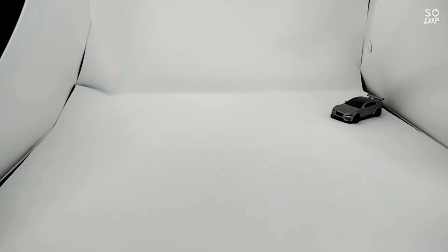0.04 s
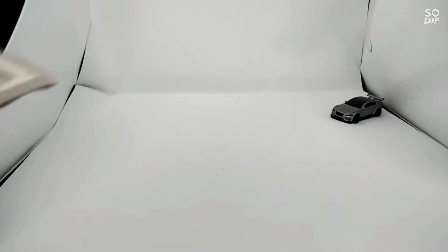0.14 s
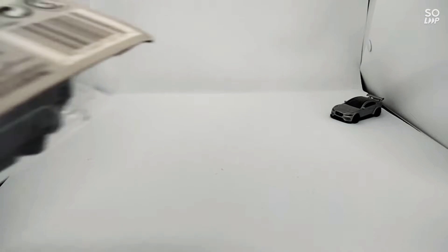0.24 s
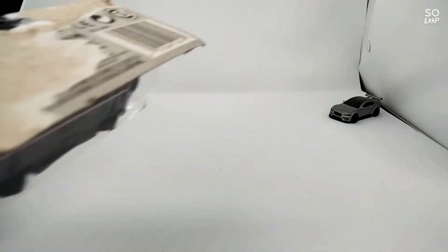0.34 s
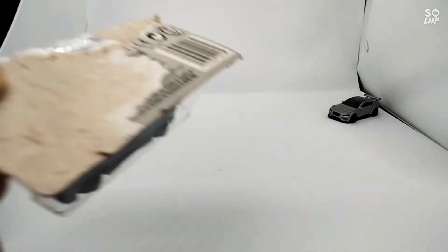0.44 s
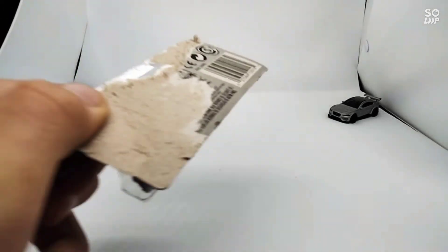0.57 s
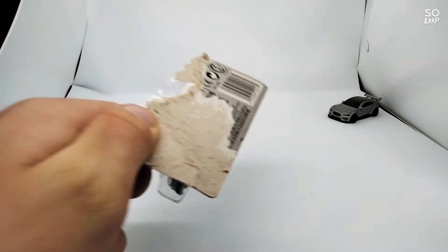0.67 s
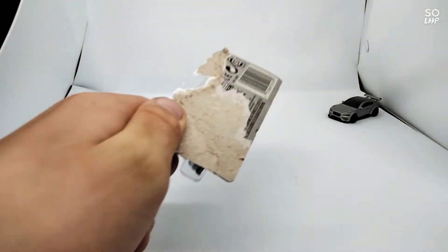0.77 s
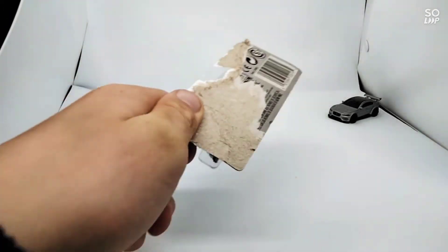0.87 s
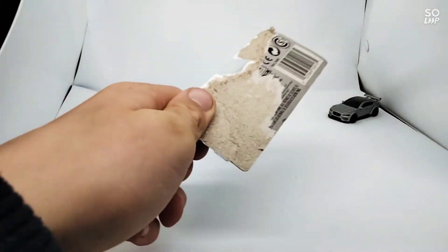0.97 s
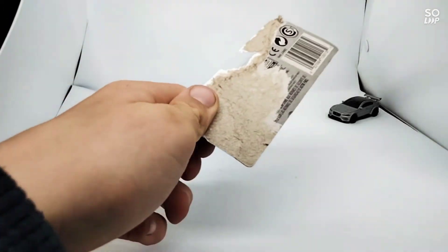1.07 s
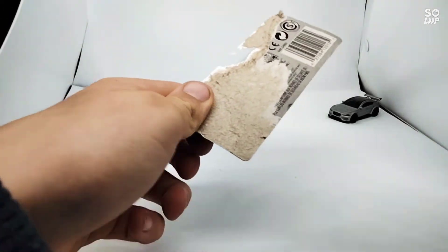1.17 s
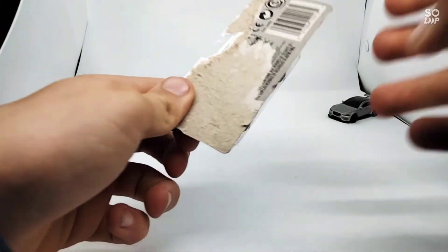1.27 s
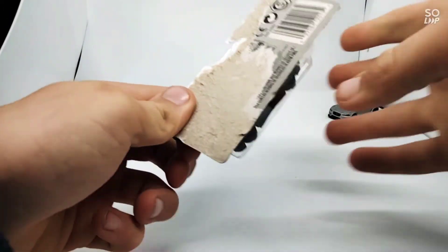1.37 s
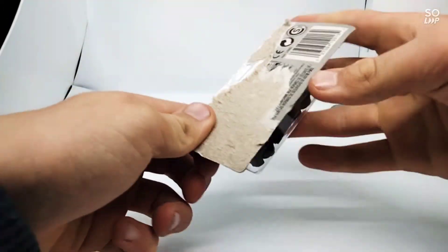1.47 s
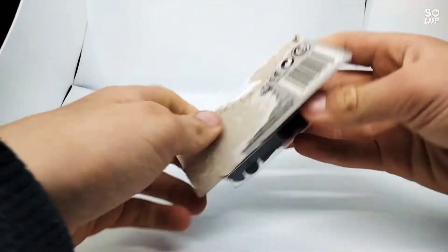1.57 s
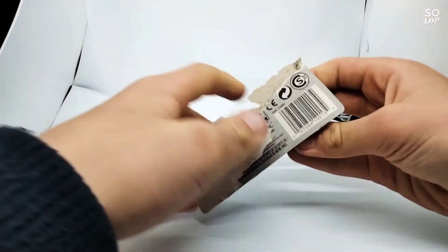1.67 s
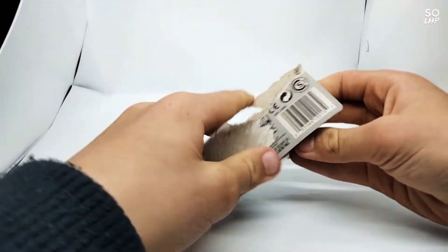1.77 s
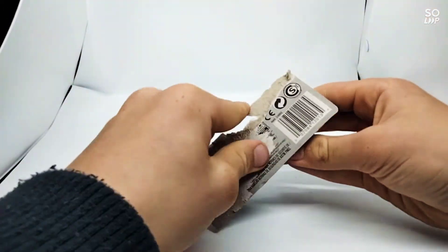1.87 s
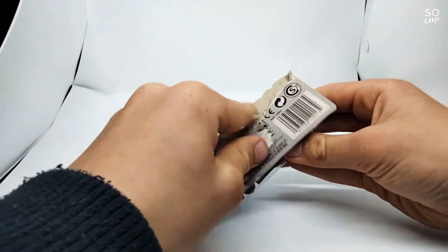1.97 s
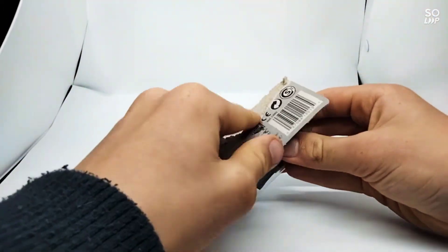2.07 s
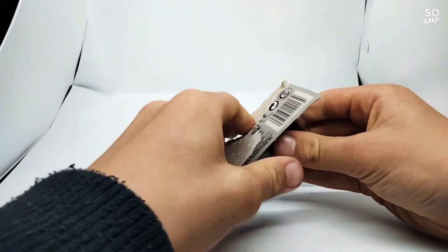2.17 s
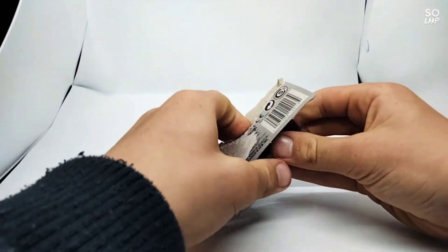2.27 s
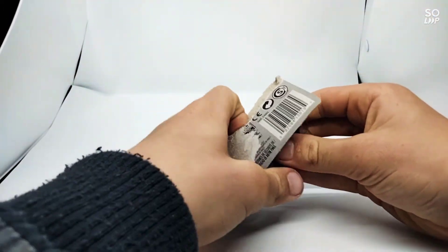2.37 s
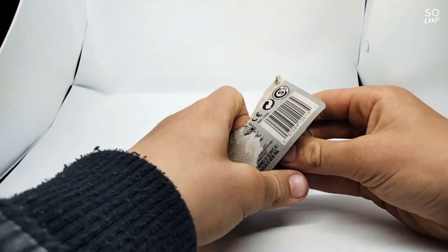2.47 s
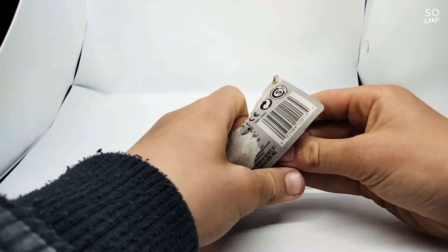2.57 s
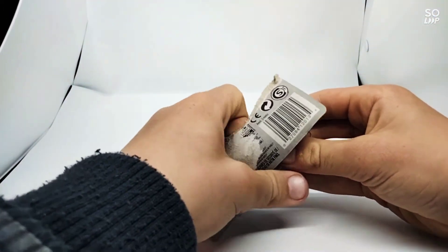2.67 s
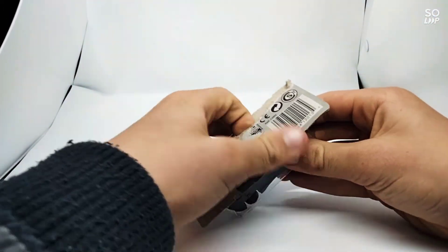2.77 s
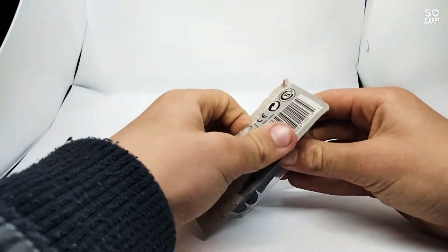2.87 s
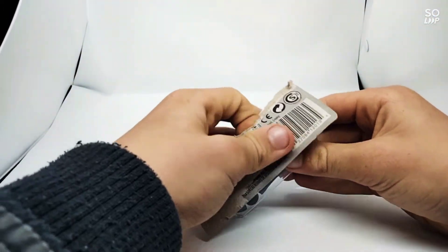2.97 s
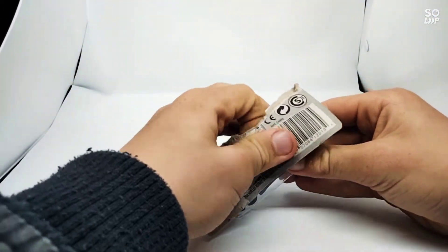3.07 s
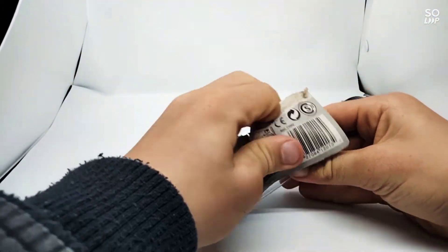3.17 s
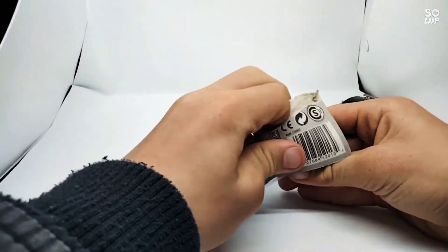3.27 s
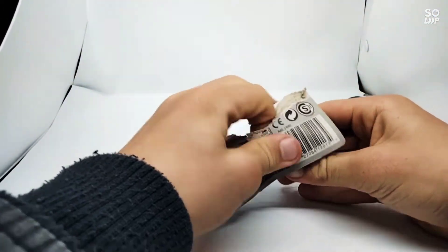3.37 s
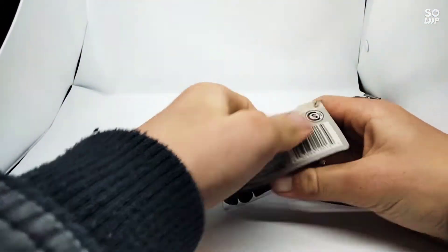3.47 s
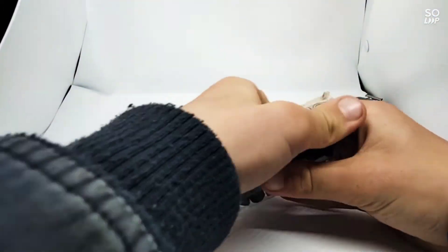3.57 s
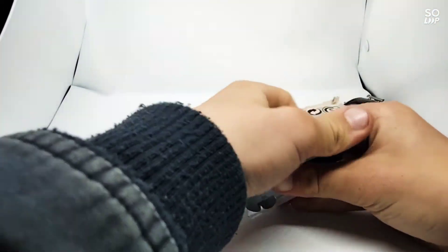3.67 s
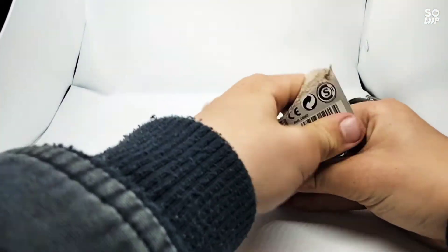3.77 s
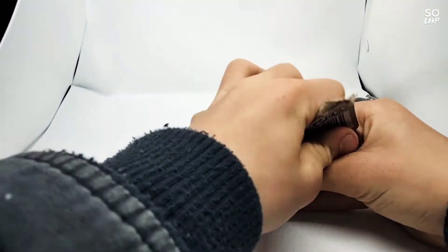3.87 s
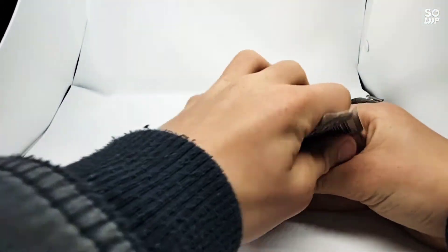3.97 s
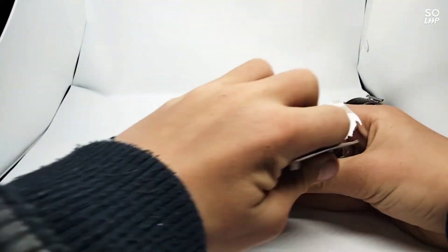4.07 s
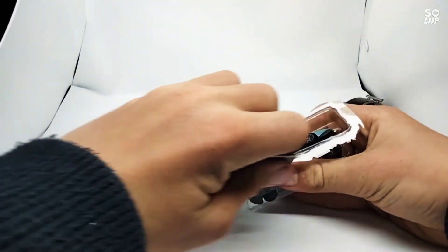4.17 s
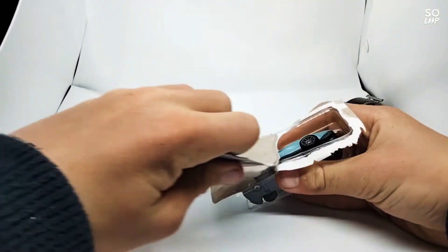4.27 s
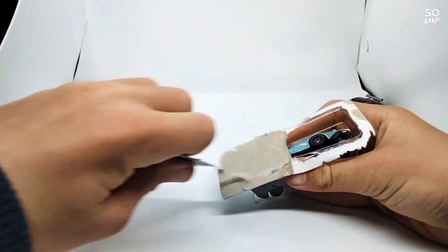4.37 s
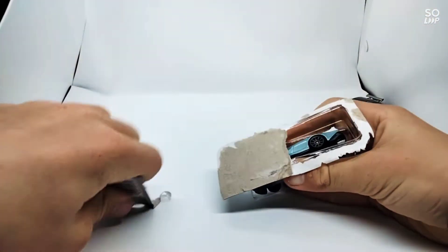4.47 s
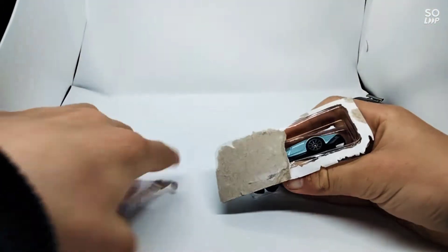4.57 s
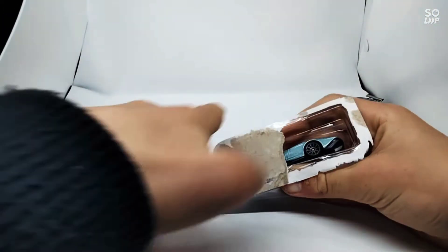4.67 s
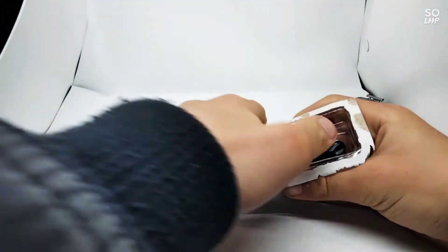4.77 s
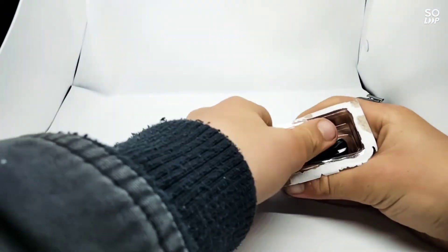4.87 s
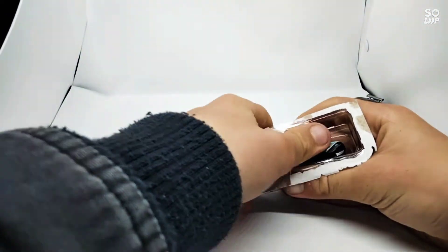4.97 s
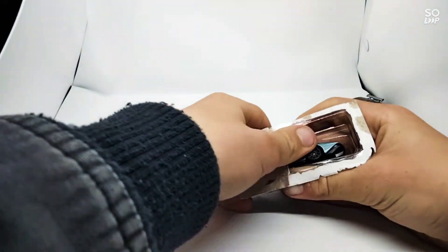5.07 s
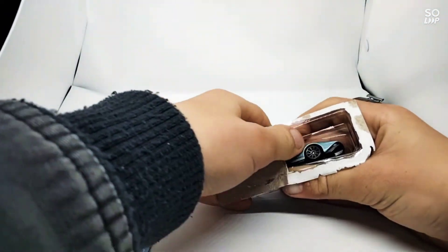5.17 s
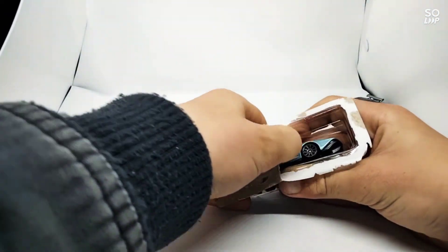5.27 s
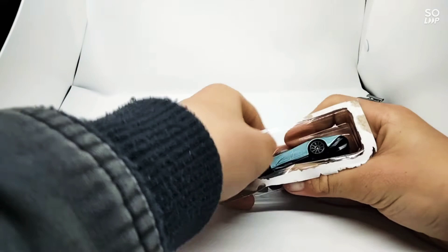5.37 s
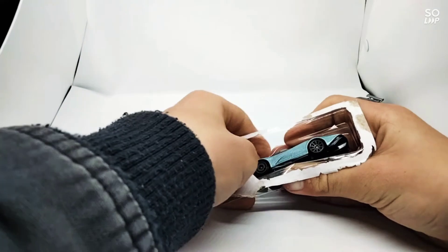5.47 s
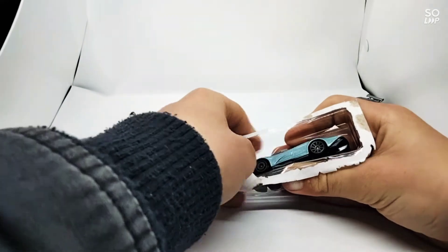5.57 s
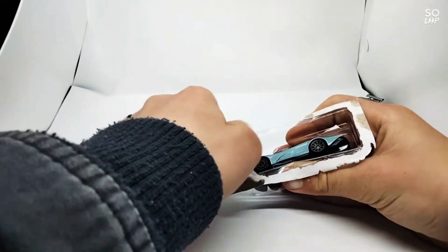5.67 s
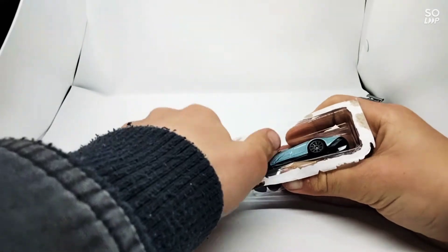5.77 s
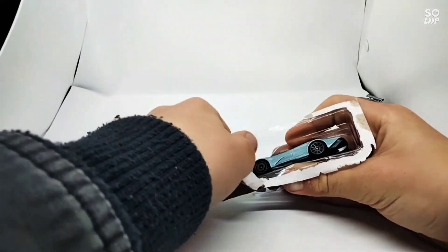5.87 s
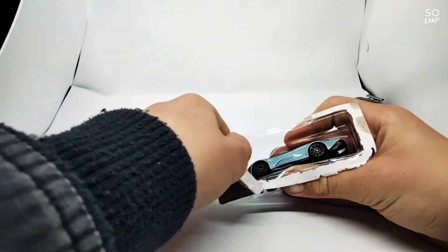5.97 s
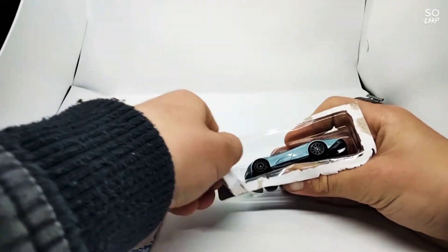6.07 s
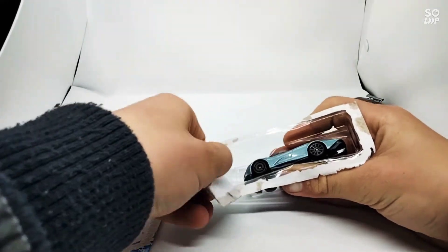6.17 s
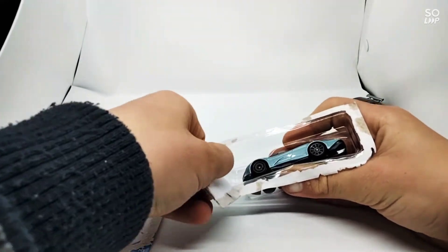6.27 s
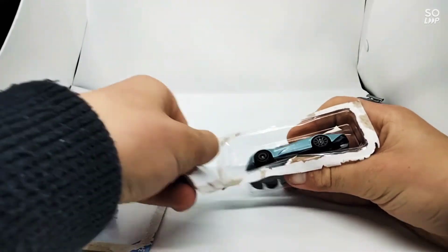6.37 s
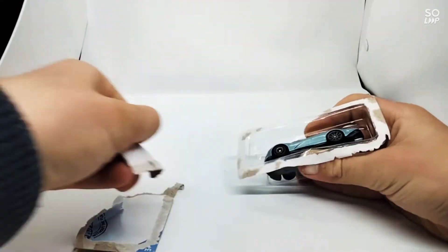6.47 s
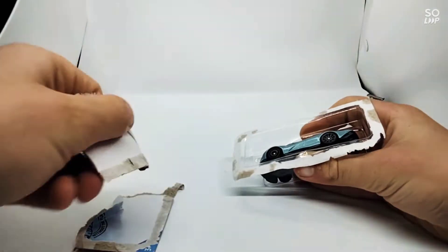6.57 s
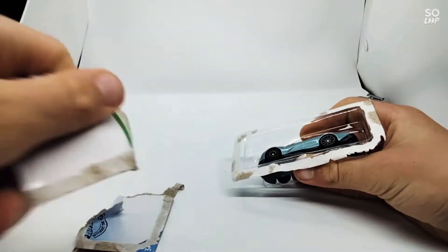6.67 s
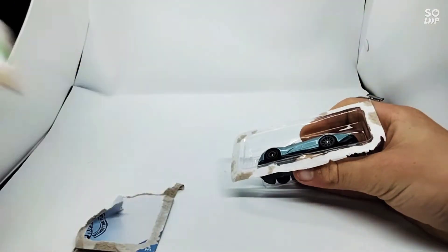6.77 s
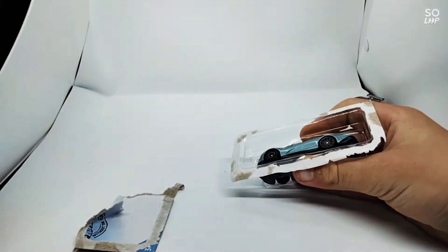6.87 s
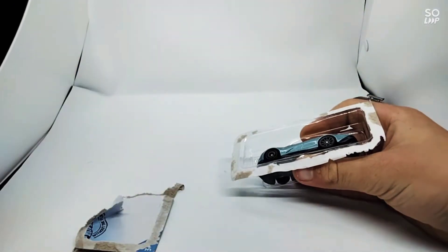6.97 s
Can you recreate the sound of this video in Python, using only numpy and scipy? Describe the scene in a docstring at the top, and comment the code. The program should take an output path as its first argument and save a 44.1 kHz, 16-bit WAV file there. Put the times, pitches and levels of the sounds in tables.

```python
"""A small paper tent on a table: hands work a card-backed blister pack open, close to the microphone.
The plastic shell buckles in sharp snaps, each a flurry of clicks through its resonances; card fibres
tear and rub as dense grains. Decaying low tones give bumps on the table and the low body of some snaps.
Arms lean on the table, two knocks further off ring round the room, and faint noise fills it.
The microphone port lifts the treble near 9 kHz; the top is cut."""
import sys
import numpy as np
from scipy import signal
from scipy.fft import rfft, irfft
from scipy.io import wavfile
from scipy.ndimage import uniform_filter1d

SR = 44100
rng = np.random.default_rng(int(sys.argv[2]) if len(sys.argv) > 2 else 0)


def dump_mix(stems):
    """Bounce the given channels to the path in sys.argv[1] as a 16-bit WAV at rate SR."""
    frames = np.atleast_2d(stems).T  # one column per channel
    limited = np.clip(frames, -1, 1)  # hard clip at full scale
    pcm = np.round(limited * 32767).astype(np.int16)
    wavfile.write(sys.argv[1], SR, pcm)


N = 310023
T = np.arange(N) / SR  # seconds

# All levels are ahead of the microphone.
# spectrum of the room air: pitch_hz, density_db (per Hz, relative)
AIR_SPECTRUM = [(20, 1), (40, -0.5), (64, -12), (110, -12), (190, -22.5), (343, -18.5), (600, -23),
                (910, -25.5), (6100, -38), (8700, -40), (15500, -37.5)]
# arms leaning on the table: time_s, rumble_db, table_top_db (both relative)
LEANING = [(0.0, -87, -82), (0.7, -89, -83), (0.98, -70, -73), (1.15, -74, -94), (1.55, -85, -74.5),
           (2.45, -77, -88.5), (2.96, -76, -79.5), (3.52, -70, -64.5), (3.8, -67, -70),
           (4.17, -66.5, -70.5), (4.38, -66, -66), (5.01, -80, -88.5), (5.58, -92, -87.5),
           (5.851, -85, -73.5), (6.07, -86, -84.5), (6.36, -56, -83), (6.54, -69, -61.5),
           (6.68, -76.5, -79.5), (7.03, -76, -85)]
# knocks across the room: start_s, level_db (relative), brightness_db, boom_db
FAR_KNOCKS = [(0.487, -33.5, -3, -3.5), (0.783, -40, -4.5, -10.5)]
# how the room dies away after a knock: band_hz, decay_t60_s
ROOM_DECAY = [(110, 0.54), (250, 0.13), (600, 0.33), (1000, 0.5), (1900, 0.39), (4000, 0.37), (9000, 0.31),
              (14000, 0.26)]
# colour of the knocks between boom and top treble: pitch_hz, colour_db
KNOCK_TINT = [(600, -11), (1000, 0.5), (1900, 0), (4000, -8)]
# modes of the struck thing: pitch_hz, level_db (relative), decay_t60_s
STRUCK_MODES = [(69, -7, 0.78), (154, -5, 0.37), (209.7, -2, 0.43), (576, -5.5, 0.47), (960, 4.5, 0.16),
                (1720, -3.5, 0.42)]
# low thuds, bumps on the table and the low body of some snaps: start_s, peak_db, pitch_hz, decay_t60_s
LOW_THUDS = [(0.107, -63, 218, 0.094), (0.2, -60.5, 145.5, 0.16), (1.079, -48.5, 57.7, 0.069),
             (1.374, -53.5, 370, 0.032), (1.52, -37, 439, 0.036), (1.737, -50.5, 42.7, 0.13),
             (1.862, -48.5, 253, 0.035), (3.618, -33, 311, 0.027), (3.7, -39.5, 58.6, 0.072),
             (3.738, -46, 43.1, 0.046), (4.347, -45.5, 216, 0.075), (4.362, -49, 62, 0.089),
             (4.681, -58.5, 126, 0.21), (5.3, -53, 67, 0.061), (5.84, -52, 500, 0.026),
             (6.324, -46, 212, 0.13), (6.416, -46.5, 64.3, 0.11), (6.531, -41.5, 46.6, 0.23),
             (6.606, -46, 60, 0.1)]
# the card never rests quite still: time_s, rustle_db (relative), tautness_db (upper over lower modes)
CARD_GRIP = [(0.0, -75, 0), (0.4, -102, -1), (0.75, -76, -10), (1.3, -95, 2), (1.5, -87, -9),
             (2.0, -84, -12), (2.28, -78.5, -0.5), (2.6, -77, -7), (3.05, -81, -19.5), (3.35, -73, -7.5),
             (3.6, -79, -3), (3.76, -72, 6), (4.1, -83, 6), (4.27, -80, -7.5), (4.4, -83, -5.5),
             (5.0, -88.5, -8), (5.3, -83.5, 14.5), (5.619, -90, -4.5), (6.2, -84, 18), (6.45, -66, 2.5),
             (7.03, -79.5, -3.5)]
# strokes that rub or rip the card: full_strength_s, fibres_db (relative), body_minus_fibres_db,
# swell_s (time constant), hold_s, decay_t60_s
CARD_RIPS = [(0.0, -63, -14.5, .01, 0.022, 0.87), (0.155, -55.5, -12.5, 0.011, 0.011, .13),
             (0.188, -56.5, -17, 0.015, 0.017, 0.21), (1.395, -62, 2, 0.0084, 0.12, 0.4),
             (1.514, -41.5, -6, 0.015, 0.00042, 0.044), (1.616, -63.5, 3, 0.0037, 0, 0.097),
             (1.749, -66.5, 0, 0.075, 0.056, 0.25), (1.876, -49, -10.5, 0.0043, 0.01, 0.2),
             (2.041, -59, 1.5, 0.008, 0.0061, 0.033), (2.168, -58, -5, 0.047, 0.124, 0.057),
             (2.268, -51, -2, 0.0096, .0, 0.13), (2.423, -50.5, -18, 0.016, 0.012, 0.13),
             (2.52, -50, -11, 0.0045, 0.0014, 0.18), (2.683, -55.5, -4, 0.028, 0.0055, 0.084),
             (2.853, -57.5, -18, 0.036, 0.12, 0.082), (3.063, -47.5, -6.5, 0.012, 0.036, 0.31),
             (3.31, -56, -2, 0.029, 0.3, 0.33), (3.476, -51, 0.5, 0.0091, .0, 0.1),
             (3.595, -56, -4, 0.015, 0.0048, .2), (3.625, -42, 4, 0.0082, .0, .033),
             (3.734, -38, -5.5, 0.052, 0.022, 0.087), (3.764, -55.5, 4, 0.027, 0.091, 0.28),
             (3.936, -39, -11, 0.027, 0, 1.5), (4.197, -39, -14, 0.012, 0.0093, 0.056),
             (4.208, -56, 2, 0.022, 0.1, 0.17), (4.246, -33, -9.5, 0.0077, .0, 0.073),
             (4.3006, -39, -18, 0.013, .0, .063), (4.471, -53.5, -7.5, 0.088, 0.0069, 0.074),
             (4.666, -59, -7, 0.0088, 0, 2.1), (4.809, -51.5, -12, 0.055, 0.0034, .053),
             (5.193, -57.5, -9.5, 0.0073, 0.065, .1), (5.241, -37, -14, 0.0058, 0.0034, 0.05),
             (5.293, -35.5, -11.5, 0.0042, 0.0075, 0.16), (5.306, -36, -11, .03, 0.0017, 0.09),
             (5.495, -63, -5, 0.012, 0.082, .15), (5.589, -50.5, -8.5, 0.036, 0.0039, 0.081),
             (5.723, -58, -7, 0.0055, 0.1, 0.18), (5.8, -59.5, 6, 0.03, .0, 0.055),
             (5.986, -43.5, -7.5, 0.0082, 0.011, 0.083), (5.999, -35, -13.5, 0.011, 0.0054, 0.11),
             (6.0, -44.5, -12.5, 0.11, 0.0027, 0.45), (6.311, -38, -28, 0.048, 0, 0.072),
             (6.33, -37.5, -5.5, 0.032, 0.0069, 0.1), (6.526, -59.5, -1, 0.044, 0.0096, 0.44),
             (6.5894, -51.5, -32, 0.0095, .0, 0.066)]
# modes of the card: pitch_hz, width_hz, level_db (relative, before tautness)
CARD_MODES = [(528, 79, -8.5), (938, 230, 3.5), (1348, 79, -1), (1590, 120, -3.5), (1950, 330, 1.5),
              (2386, 220, -4.5), (2760, 390, -4), (3790, 1200, -11.5)]
# buckles of the shell: start_s, level_db (relative), ring_hz, ring_minus_level_db,
# sheet_minus_level_db, decay_t60_s
SHELL_SNAPS = [(0.04, -49, 1770, -3, -3, 0.035), (0.0576, -57.5, 876, 0, -6, 0.059),
               (0.079, -57.5, 1860, 5, -5, 0.032), (0.0958, -58, 1870, 11, -5, 0.024),
               (0.1588, -39.5, 1260, -18, -16, 0.092), (0.197, -49, 1370, -2.5, -1, 0.042),
               (0.265, -67, 1270, 2, -6, 0.04), (0.228, -48.5, 2700, -12.5, -22, 0.046),
               (0.313, -67, 1685, 2, -3, 0.04), (0.383, -70.5, 996, 8.5, -10, 0.048),
               (1.1817, -64.5, 504, 6.5, 2.5, 0.059), (1.367, -54, 1790, 3, -17, 0.055),
               (1.3779, -41, 1166, 2.5, -14, 0.1), (1.411, -51, 960, 4, -12, 0.054),
               (1.432, -45.5, 2100, 5.5, -13, 0.017), (1.4885, -44, 1000, 1, -13, 0.039),
               (1.494, -37, 1510, 4, -2, 0.046), (1.5104, -32.5, 1270, 4, 2.5, 0.089),
               (1.523, -34.5, 1530, 7.5, -10, 0.036), (1.5631, -51.5, 1820, 13, 2, 0.033),
               (1.6174, -44, 1310, -2.5, -4, 0.072), (1.636, -49, 1500, 1, 1, 0.044),
               (1.669, -53, 1090, 3, -10, 0.046), (1.701, -50.5, 1032, -3, -6, 0.028),
               (1.73, -44, 1480, -4, -4, 0.066), (1.7395, -40, 1330, -5.5, -15, 0.039),
               (1.8616, -31.5, 1430, -0.5, -1.5, 0.046), (2.1494, -47, 940, -6.5, -20, 0.14),
               (2.4803, -58, 1430, 15.5, 10, 0.024), (2.5067, -20, 1330, -21, -16, 0.036),
               (2.592, -61.5, 970, 5.5, -8, 0.03), (2.6625, -51, 935, -28, -16, 0.16),
               (2.694, -49.5, 960, 6, -3, 0.063), (2.828, -59, 890, 5.5, -8, 0.054),
               (2.85, -55, 900, 3.5, -2, 0.32), (2.891, -45, 860, 2, -12, 0.037),
               (2.9284, -42.5, 961, -34, -34, 0.071), (2.956, -35.5, 525, -39, -37, 0.045),
               (2.9897, -26, 910, -10.5, -5, 0.045), (3.0132, -37, 886, 13, -19, 0.045),
               (3.0517, -20.5, 1140, 1.5, 3, 0.017), (3.054, -15.5, 584, -8, -8, 0.054),
               (3.0686, -23.5, 1050, -10, -21, 0.055), (3.106, -22, 1040, 5.5, -52, 0.023),
               (3.137, -45, 970, 6, -4, 0.048), (3.273, -59, 1360, 9, -16, 0.25),
               (3.2955, -37.5, 1074, 4, 0, 0.057), (3.3245, -42.5, 1310, -25, 9, 0.045),
               (3.336, -31, 906, -10, -5.5, 0.044), (3.3738, -41, 920, 0.5, -16, 0.057),
               (3.4003, -43, 1000, 9, -23, 0.042), (3.479, -41.5, 2090, 8.5, -10, 0.05),
               (3.5623, -29.5, 1270, -4.5, -7, 0.038), (3.5668, -23.5, 1230, 4, -8, 0.034),
               (3.582, -30, 1630, -3, -10, 0.046), (3.6161, -26.5, 1010, 6, -23, 0.047),
               (3.6628, -34.5, 670, -5.5, -9, 0.32), (3.6906, -12, 1410, -9.5, -27, 0.068),
               (3.6958, -18, 1070, -0.5, -5.5, 0.055), (3.7138, -35.5, 1870, 17.5, -3, 0.027),
               (3.7142, -9.5, 2200, -7.5, -3, 0.014), (3.7374, -3.5, 1230, -8.5, -4, 0.027),
               (3.826, -30.5, 2410, -19, -13, 0.054), (3.912, -11, 1320, -15.5, -12.5, 0.05),
               (3.9155, -11.5, 1330, -12, -7.5, 0.032), (3.9348, -30, 1040, -13, -6, 0.19),
               (3.9565, -28.5, 1320, -9, -8, 0.17), (4.0235, -40, 825, -10.5, -3.5, 0.37),
               (4.161, -41, 1830, -8, -4, 0.066), (4.198, -29, 1570, -3.5, -8, 0.34),
               (4.247, -32, 1540, 3, -7, 0.19), (4.373, -52, 1050, 5.5, -10, 0.052),
               (4.398, -49.5, 1980, 1, -14, 0.069), (4.454, -38, 1260, -9, -9, 0.097),
               (4.597, -55.5, 851, -0.5, 2.5, 0.052), (4.651, -59, 1380, 1, -4, 0.074),
               (4.6731, -33, 960, -1, -4, 0.043), (4.8714, -37.5, 1404, -3.5, -1, 0.031),
               (5.014, -59.5, 1300, 4.5, -15, 0.093), (5.0798, -30.5, 1470, -17, -14, 0.038),
               (5.177, -36, 1370, -14, -15.5, 0.044), (5.199, -39, 1360, -12, -19, 0.045),
               (5.2062, -34.5, 1360, 1, -10, 0.021), (5.2261, -30.5, 1860, -7, -10, 0.11),
               (5.2327, -26, 1760, -17, -12, 0.095), (5.2596, -30, 1510, -4, -17, 0.036),
               (5.289, -35.5, 1640, -3.5, -12, 0.13), (5.468, -48, 1880, -2.5, -8.5, 0.059),
               (5.518, -57, 800, 3, -11, 0.2), (5.603, -57.5, 950, 5, -7.5, 0.042),
               (5.7082, -47, 1540, -15, -13, 0.038), (5.765, -38, 2960, -5, -10, 0.041),
               (5.786, -43, 1850, -2, -19.5, 0.04), (5.801, -33.5, 1750, -14, -12, 0.07),
               (5.8391, -25, 1720, -11, -35, 0.048), (5.9348, -36, 2300, -33, -23, 0.11),
               (5.9597, -33, 2250, -32, -10.5, 0.13), (6.103, -44.5, 2350, -23, -13, 0.17),
               (6.4522, -38.5, 3210, -2, -1, 0.048), (6.485, -47.5, 2360, 2, -16, 0.03),
               (6.53, -46.5, 764, 6.5, -6, 0.064)]
# resonances of the shell: multiple_of_ring, level_db (relative), width_hz
SHELL_MODES = [(.55, -7, 121.7), (1, 2.5, 170), (1.45, -5.5, 150), (2.1, -3.5, 119.8)]
# resonances of the microphone port: pitch_hz, width_hz, added_db (against the direct sound)
PORT_MODES = [(8284, 970, 7), (8913, 600, 10)]

AIR_DB = -73.5  # rms
RUSTLE_BODY_DB = 1.5  # card body minus fibres in the faint rustle
SHEET_HZ, CRACK_HZ = 2400, 6000  # lower edges of the sheet and crack bands of a snap
CRACK_DB = -3.5  # crack peak against the level of its snap
TOP_HZ = 15550  # upper limit of the microphone


def undb(db):
    """Amplitude factor of a level in dB."""
    return 10 ** (np.asarray(db) / 20)


def level(x, db):
    """Scale to an rms level in dB."""
    return x * undb(db) / np.sqrt(np.mean(x ** 2))


def peak(x, db):
    """Scale to a peak level in dB."""
    return x * undb(db) / np.max(np.abs(x))


def band(x, lo_hz, hi_hz):
    """Keep one flat band of pitches."""
    edges_hz = [lo_hz, min(hi_hz, SR / 2.2)]
    return signal.sosfilt(signal.butter(2, edges_hz, "band", fs=SR, output="sos"), x)


def ring(x, hz, width_hz):
    """One resonance, gain 1 at the centre."""
    return signal.lfilter(*signal.iirpeak(hz, hz / width_hz, SR), x)


def fade(t, t60):
    """Exponential die-away, down 60 dB after t60 seconds; silent before t = 0."""
    return np.exp(-np.log(1000) * np.maximum(t, 0) / t60) * (t >= 0)


def walk(rate):
    """Random levels drawn rate times a second and joined by straight slopes; spread near 1."""
    step = int(SR / rate)
    held = np.repeat(rng.standard_normal(N // step + 1), step)
    return 1.15 * uniform_filter1d(held, step)[:N]


def grains(count, scatter_db):
    """Dense clicks of both signs, some much larger than the rest."""
    boost = np.minimum(rng.exponential(size=count), 4.5)
    return rng.standard_normal(count) * undb(scatter_db * boost)


def add(out, s, x):
    """Mix x into out from s seconds on."""
    i = int(s * SR)
    out[i:i + len(x)] += x[:len(out) - i]


def room_air():
    """Steady faint noise of the room, strongest in the lowest bass: random noise shaped by a spectrum."""
    hz, db = np.transpose(AIR_SPECTRUM)
    f = np.arange(N // 2 + 1) * SR / N + 1  # 1 Hz up, so the logarithm exists
    shape = undb(np.interp(np.log(f), np.log(hz), db))
    return level(irfft(rfft(rng.standard_normal(N)) * shape, N), AIR_DB)


def leaning_arms():
    """Low rumble, and the table top murmuring under the arms: two noise bands that follow the lean."""
    s, rumble_db, top_db = np.transpose(LEANING)
    rumble = level(band(rng.standard_normal(N), 16, 48), 2)
    top = level(band(rng.standard_normal(N), 90, 260) * undb(2.5 * walk(14)), 2)
    return undb(np.interp(T, s, rumble_db)) * rumble + undb(np.interp(T, s, top_db)) * top


def far_knocks():
    """Only the room's reply arrives: noise that dies away band by band, with the struck thing's modes."""
    out, t = np.zeros(N), T[:SR]
    tint_hz, tint_db = np.transpose(KNOCK_TINT)

    def reply(hz, width, db, t60, swell_cycles):
        noise = level(ring(rng.standard_normal(SR), hz, width * hz), db)
        swell = 1 - np.exp(-t * hz / swell_cycles)  # a few cycles pass before a band is full
        return noise * fade(t, t60) * swell

    for s, db, bright_db, boom_db in FAR_KNOCKS:
        for hz, t60 in ROOM_DECAY:
            if hz < 400:
                colour_db = boom_db
            elif hz > 6000:
                colour_db = bright_db - 7.0
            else:
                colour_db = np.interp(hz, tint_hz, tint_db)
            add(out, s, reply(hz, 0.27, db + colour_db - 12, t60, 0.91))
        for hz, mode_db, t60 in STRUCK_MODES:
            add(out, s, reply(hz, 0.05, db + mode_db - 11.5, t60, 1.4))
    return out


def low_thuds():
    """Bumps on the table and the low body of some snaps: a decaying tone with a weaker overtone."""
    out, t = np.zeros(N), T[:SR // 2]
    for s, db, hz, t60 in LOW_THUDS:
        swing = -np.sin(2 * np.pi * hz * t) - 0.25 * np.sin(2 * np.pi * 3.2 * hz * t)
        onset = np.minimum(t * hz / 0.063, 1)  # full after 0.063 cycle
        add(out, s, peak(swing * fade(t, t60) * onset, db))
    return out


def tearing_card():
    """Fibres part in patches of grains that shake the card; each stroke swells, holds and dies away."""
    s, rustle_db, taut_db = np.transpose(CARD_GRIP)
    taut_db = np.interp(T, s, taut_db)
    pull = undb(np.interp(T, s, rustle_db))  # drives the fibres
    shake = undb(RUSTLE_BODY_DB) * pull  # drives the card body
    for s, db, body_db, swell, hold, t60 in CARD_RIPS:
        rise = np.exp(np.minimum(T - s, 0) / swell)
        rip = undb(db) * rise * fade(np.maximum(T - s - hold, 0), t60)
        pull = pull + rip
        shake = shake + undb(body_db) * rip

    patches = undb(1.9 * walk(45) + 2.3 * walk(250))
    fibres = grains(N, 2.6) * patches
    card = np.zeros(N)
    for hz, width_hz, db in CARD_MODES:
        # each mode catches and lets go on its own
        mode = level(ring(fibres * undb(2.5 * walk(70)), hz, width_hz), -12.5)
        # a taut card favours its upper modes
        tilt_db = 0.71 * taut_db * np.log2(hz / 1550)
        card += undb(db + tilt_db + 2.3 * walk(12)) * mode
    card = band(band(card, 320, 11000), 320, 11000)  # a small card radiates no bass

    hiss = band(grains(N, 1.2) * patches, 6900, 11000)
    # the finest fibres part in their own patches
    finest = band(grains(N, 4.03) * undb(3.5 * walk(140)), 12000, SR)
    hiss = hiss + undb(-0.5 + 2.0 * walk(6)) * finest
    return pull * level(hiss, -8.5) + shake * card


def snapping_shell():
    """One fold flips with a click, smaller folds follow in a dying flurry; the bent shell rings."""
    out, t = np.zeros(N), T[:SR // 4]
    for s, db, hz, ring_db, sheet_db, t60 in SHELL_SNAPS:
        flurry = grains(len(t), 2.9) * np.minimum(t / 0.0013, 1)
        # the first fold to flip; in a short snap it is nearly all there is
        flurry[round(.0008 * SR)] += 0.5 / t60 + 2.5
        flurry = flurry * (fade(t, t60) + undb(-28.5) * fade(t, 0.25))

        shell = np.zeros(len(t))
        for multiple, mode_db, width_hz in SHELL_MODES:
            # every fold bends the shell a little differently, so all but the main ring shift
            bend = 1 if multiple == 1 else 1 + 0.06 * rng.standard_normal()
            shell += undb(mode_db) * ring(flurry, multiple * bend * hz, width_hz)
        shell = peak(shell, 0) + peak(band(flurry, 0.62 * hz, 1.75 * hz), -2.7)
        shell = band(band(shell, 370, 9000), 370, 9000)

        sheet = band(flurry, SHEET_HZ, CRACK_HZ)
        sheet = sheet + undb(1.5) * ring(sheet, 3190, 900) + undb(1.5) * ring(sheet, 3920, 930)
        crack = band(flurry, CRACK_HZ, SR)
        snap = peak(crack, db + CRACK_DB) + peak(shell, db + ring_db) + peak(sheet, db + sheet_db)
        add(out, s, snap)
    return out


def scene():
    """The near pack with its reflections, over the low thuds, leaning arms, far knocks and room air."""
    background = room_air() + leaning_arms() + far_knocks() + low_thuds()
    near = tearing_card() + snapping_shell()
    t = T[:SR // 3]
    # the paper tent and the room send back a short wash and a fainter, longer one
    wash = rng.standard_normal(len(t)) * (fade(t - .004, 0.071) + undb(-13.5) * fade(t - .01, 0.35))
    wash = wash / np.sqrt(np.sum(wash ** 2))
    near = near + undb(-26.5) * signal.fftconvolve(near, wash)[:N]
    return (background + near)[None]


def record(dry):
    """The microphone port resonates in the treble; a steep low-pass cuts the top."""
    heard = dry + sum(undb(db) * ring(dry, hz, width_hz) for hz, width_hz, db in PORT_MODES)
    return signal.sosfilt(signal.ellip(10, .2, 70, TOP_HZ, fs=SR, output="sos"), heard)


dry = scene()
out = record(dry)
dump_mix(out)
```